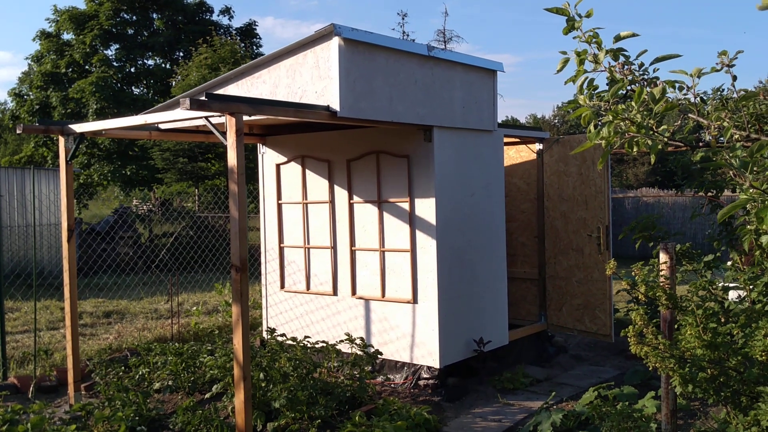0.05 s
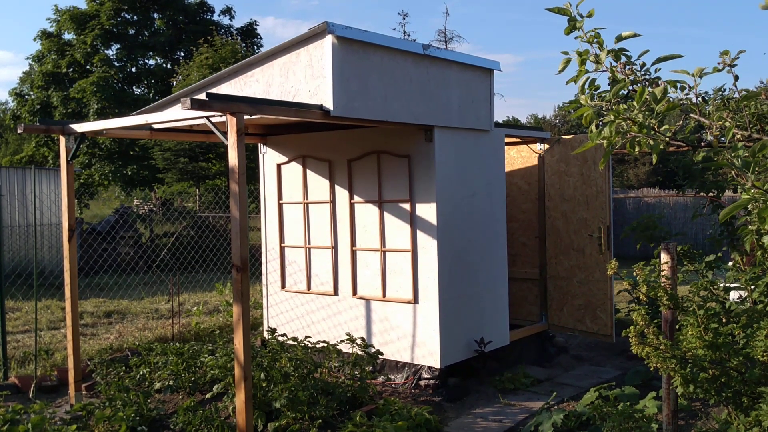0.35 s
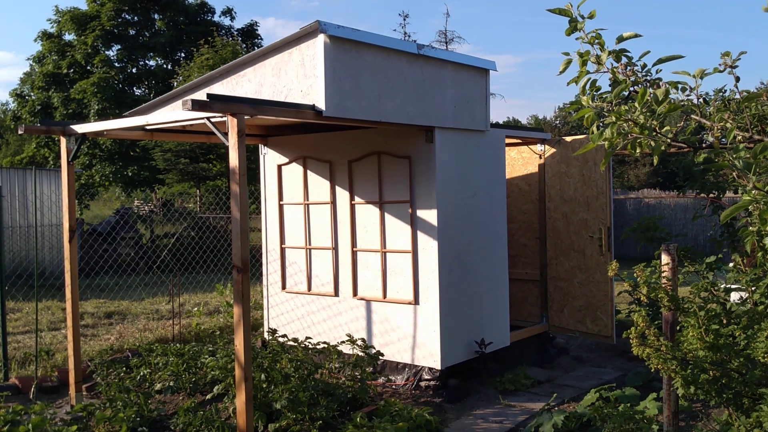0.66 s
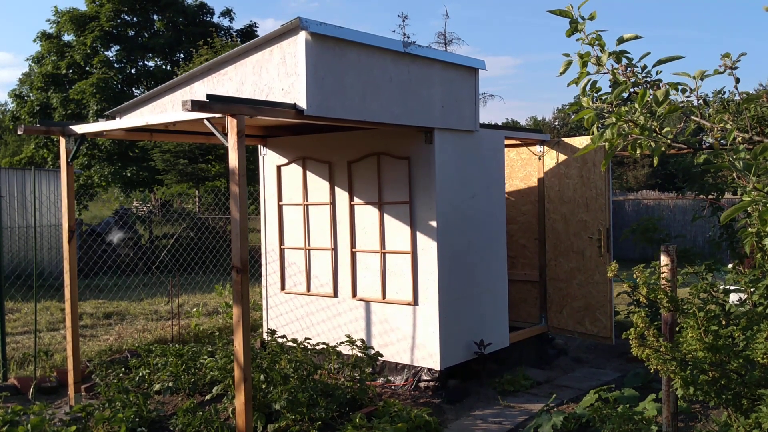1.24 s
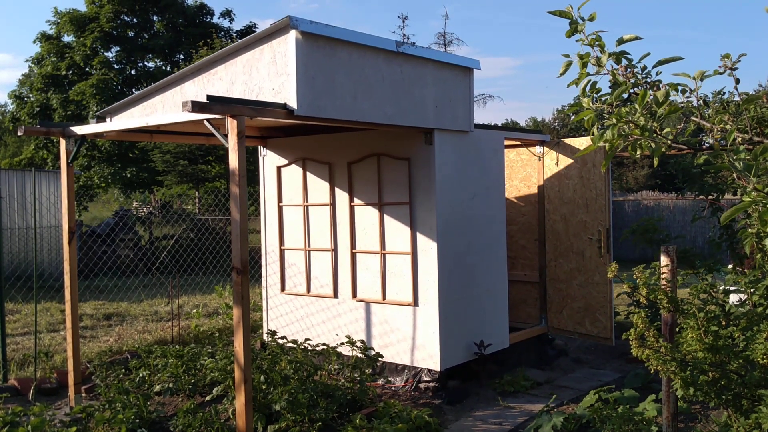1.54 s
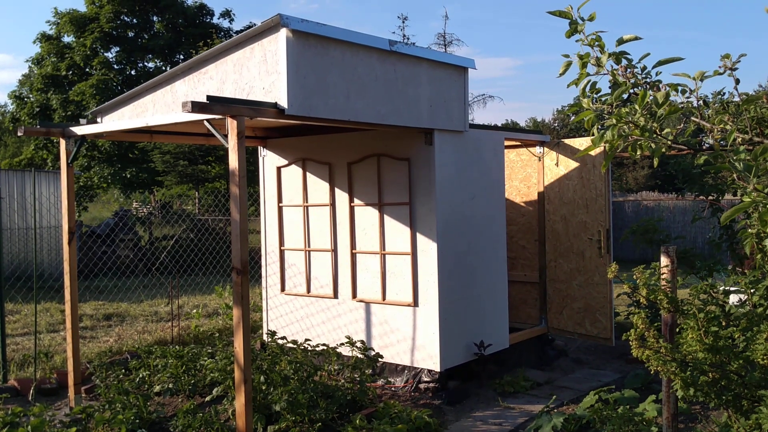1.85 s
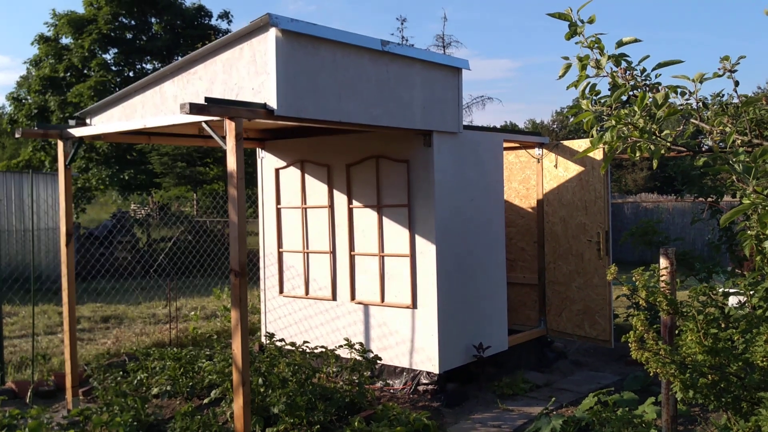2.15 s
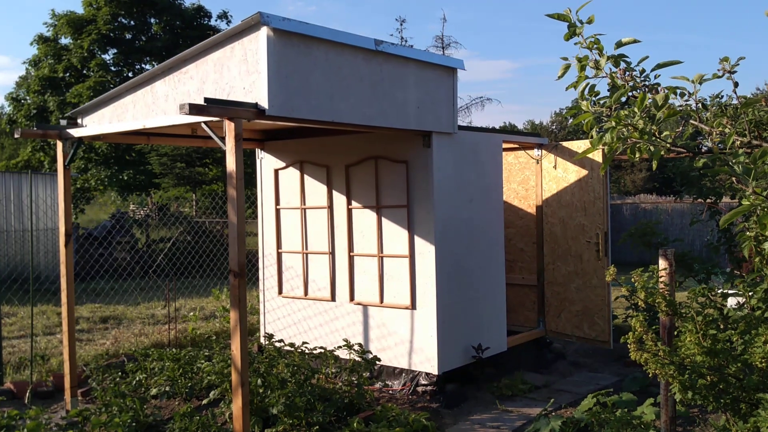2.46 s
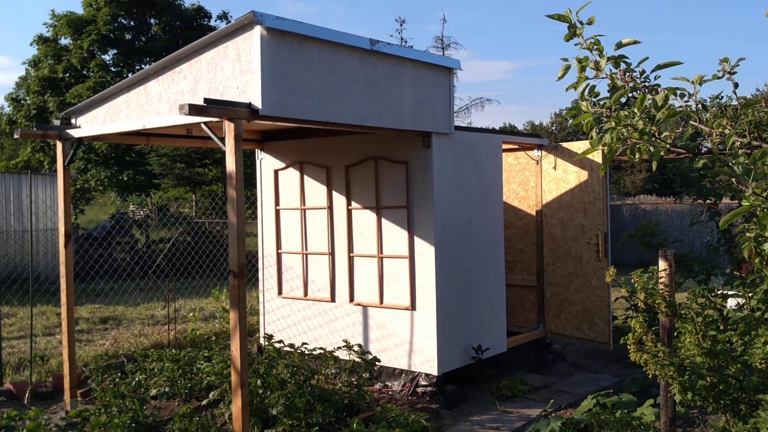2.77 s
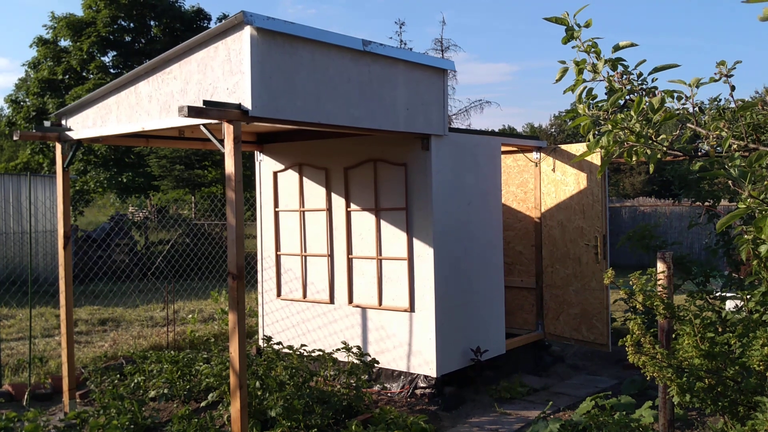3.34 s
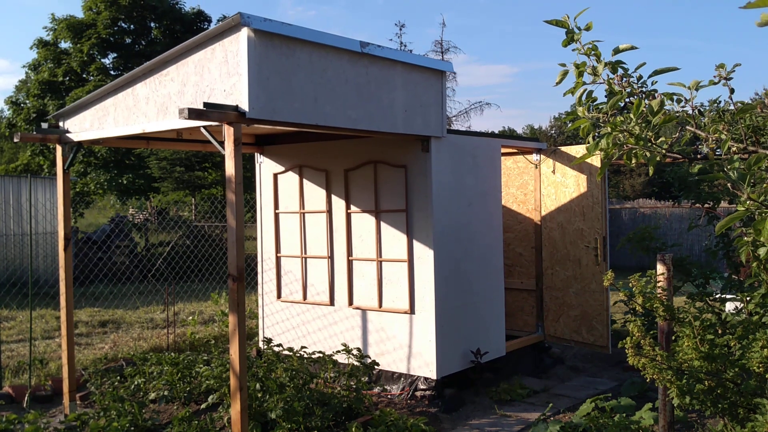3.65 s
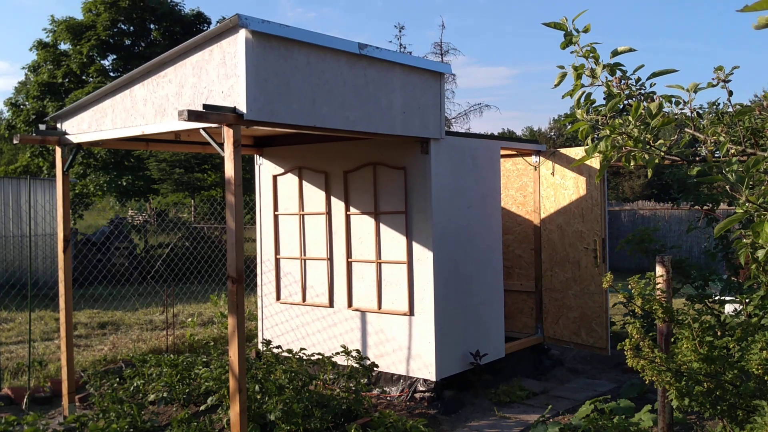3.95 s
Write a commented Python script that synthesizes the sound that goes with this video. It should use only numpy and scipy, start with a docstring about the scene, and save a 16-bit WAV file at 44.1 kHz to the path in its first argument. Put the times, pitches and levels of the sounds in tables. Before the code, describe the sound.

A small wooden roof rolls along rails with a low rumble, rattling and knocking. It squeaks once midway, then slows to a stop as a distant bird chirps over a soft garden hush.

```python
"""A low wooden rumble: a small roof rolls along rails in a garden, then slows to a stop.
Its rollers drum the panels and rattle on the rails, the frame ticks, and an edge brushes along.
One sharp squeak sounds midway. A far bird chirps once at the start and again as the rumble dies.
The garden hums and hisses softly behind it all."""
import sys
import numpy as np
from scipy import signal
from scipy.fft import rfft, irfft
from scipy.io import wavfile

SR = 44100
rng = np.random.default_rng(int(sys.argv[2]) if len(sys.argv) > 2 else 0)


def pcm_store(signal):
    """Save signal as 16-bit PCM."""
    levels = np.round(np.clip(np.atleast_2d(signal), -1, 1) * 32767)
    wavfile.write(sys.argv[1], SR, levels.astype(np.int16).T)


N = 176400
TIME = np.arange(N) / SR
SIZE = 2 ** 18  # samples, with room for ringing
HZ = np.maximum(np.arange(SIZE // 2 + 1) * SR / SIZE, 1)


def roof():
    """The wooden panels boom as the rollers drum on them."""
    # Each row: time in seconds, level in dB.
    push = [(0, -43.5), (.55, -42.5), (.95, -43), (1.25, -42), (1.5, -40), (1.8, -40.5), (2.1, -42),
            (2.4, -41), (2.5, -45.5), (2.72, -48.5), (2.8, -49.5), (3.1, -55), (3.5, -57.5), (3.8, -68.5),
            (4, -62.5)]
    # Each row: pitch in Hz, relative level in dB.
    colour = [(20, -38.5), (33, -20), (47, -16), (70, 1), (90, -2.5), (115, -7.5), (180, -5), (270, -10),
              (380, -9), (480, -16.5), (700, -27), (1500, -73), (4000, -79)]
    # Each row: ringing pitch in Hz, width in Hz, boost in dB.
    modes = [(44, 4.2, 3.5), (62.6, 1.3, 7), (87.5, 9.1, 5.5), (138, 9.3, 1.5), (163, 4.7, 1.5),
             (194.4, 13.7, 4.5), (232.7, 3.7, 5.5), (312.3, 3.9, 8.5), (340, 16, 4)]
    return body(level(push) * rolling(smooth_db=4, judder_db=0.5, judder_hz=17), colour, modes)


def rolling(smooth_db, judder_db, judder_hz, grit_per_s=420, grit_spread_db=2.5):
    """The force of rolling: jolts from grit over a smooth rub, under a shaking load."""
    sizes = from_db(grit_spread_db * np.minimum(rng.exponential(1, N), 3)) * rng.choice([-1, 1], (2, N))
    jolts = rms_one(sizes * (rng.random(N) < grit_per_s / SR))
    rub = from_db(smooth_db) * rng.standard_normal((2, N))
    return rms_one((jolts + rub) * from_db(judder_db * np.tanh(drift(judder_hz))))


def panels():
    """Each part of the roof rings most as the rollers pass under it."""
    # Each row: loudest moment and half-length in seconds, pitch and width in Hz, level in dB.
    swells = [(0.533, 0.19, 335, 13, -51.5), (0.545, 0.56, 197, 86, -51.5), (1.15, 0.23, 58, 9.4, -54.5),
              (1.29, 0.33, 138.3, 14, -53), (1.59, 0.54, 192, 83, -49.5), (1.7, 0.24, 340, 90, -51.5),
              (1.852, 0.53, 88.8, 17.4, -49), (1.956, 0.6, 204, 26, -49)]
    return sum(from_db(db) / (1 + np.square((TIME - s) / half_s) ** 2) * noise_band(hz, width)
               for s, half_s, hz, width, db in swells)


def bumps(rise_s=0.015):
    """Each bump makes one panel swell into a short boom and die away."""
    # Each row: start in seconds, level in dB, pitch in Hz.
    booms = [(.165, -44, 292), (0.369, -44.5, 190), (.445, -43.5, 221.6), (0.516, -40.5, 340),
             (.79, -41.5, 192.4), (1.12, -47, 86.5), (1.31, -44, 166.3), (1.358, -40, 182),
             (1.485, -41, 68.4), (1.495, -47, 311), (1.575, -42, 205), (1.65, -42, 204.1),
             (1.878, -36.5, 184), (2.28, -45.5, 204.2), (2.39, -42, 80), (2.395, -44.5, 200.4),
             (2.68, -46, 84.8), (2.69, -54, 224.3), (3.925, -71, 240)]
    out = np.zeros(N)
    for s, db, hz in booms:
        age = np.clip((TIME - s) / rise_s, 0, 20)
        tone = np.sqrt(2) * np.sin(2 * np.pi * (hz * TIME + rng.random()))
        out += from_db(db) * age * np.exp(1 - age) * tone
    return out


def rails(knock_boost_db=14.5):
    """The rollers chatter on the rails and now and then give a hollow knock."""
    # Each row: time in seconds, relative level in dB.
    loudness = [(0, -49), (.6, -49), (1.2, -47.5), (1.45, -46), (2.05, -48.5), (2.38, -49), (2.5, -53),
                (2.76, -59.5), (2.88, -59), (3, -64), (3.6, -70), (4, -82)]
    hits = [(.341, -50), (.405, -45), (.514, -32), (.701, -43), (.874, -30.5), (1.013, -31.5), (1.202, -31),
            (1.318, -32), (1.422, -29.5), (1.631, -29.5), (1.705, -33), (1.794, -33.5), (1.94, -27.5),
            (1.975, -29.5), (2.165, -30.5), (2.229, -33), (2.247, -31), (2.336, -33), (2.366, -32.5),
            (2.409, -37), (2.592, -37.5), (2.88, -41.5), (3.937, -46)]
    # Each row: pitch in Hz, relative level in dB.
    rail_colour = [(200, -27.5), (450, -11.5), (580, -5.5), (700, -1), (870, -3.5), (1000, -15),
                   (1400, -14.5), (1750, -24.5), (2200, -20), (3000, -24), (4000, -34.5), (6000, -40),
                   (14000, -49.5)]
    knock_colour = [(200, -23.5), (480, -14.5), (640, -9), (780, 9), (900, -6.5), (1020, -13.5),
                    (1400, -18.5), (2000, -53), (4000, -39), (14000, -51)]
    # Each row: ringing pitch in Hz, width in Hz, boost in dB.
    modes = [(502, 5.7, 2.5), (698, 11, 3.4), (791, 50, 2.3), (865, 27, 4.4), (1086, 86, 6.8),
             (1677, 35, 9.6), (1920, 45, 10), (2830, 23, 2.8)]
    chatter = level(loudness) * rolling(smooth_db=3, judder_db=2.5, judder_hz=36.2)
    knocks = np.zeros((2, N))
    for s, db in hits:
        knocks[:, int(s * SR)] = from_db(db + knock_boost_db) * rng.choice([-1, 1], 2)
    return body(chatter, rail_colour, modes) + body(knocks, knock_colour, modes)


def frame(split_hz):
    """The frame gives dry ticks, some dull and some bright."""
    # Each row: start in seconds, level in dB, extra treble in dB, fade time in seconds.
    ticks = [(.298, -49, -5, 0.025), (0.653, -58, 8.5, 0.011), (0.724, -48, -9, 0.015),
             (0.799, -46, -5.5, .018), (.972, -47.5, 7, 0.006), (1.314, -36, -30, .012),
             (1.383, -51, 2.5, 0.022), (1.523, -48.5, -2.5, 0.0086), (1.943, -51, -.5, 0.01),
             (2.07, -50, -7, 0.0063), (2.23, -49, -11, .008), (2.244, -44, -10, 0.0069),
             (2.407, -48, -16, 0.0084), (2.797, -54.5, -5, 0.042), (2.849, -61, -10, 0.013),
             (3.936, -60.5, 2.5, 0.021)]
    # Each row: pitch in Hz, relative level in dB.
    colour = [(300, -13), (800, 8), (1200, 9.5), (1500, 8), (2000, 5), (3200, 3), (4200, -7), (5500, -3.5),
              (8000, -21), (14000, -28)]
    thud = body(blows([(s, db, decay) for s, db, _, decay in ticks]), colour)
    crack = body(blows([(s, db + bright, decay) for s, db, bright, decay in ticks]), colour)
    dull = signal.sosfilt(signal.butter(4, split_hz, fs=SR, output="sos"), thud)
    return dull + signal.sosfilt(signal.butter(2, split_hz, "high", fs=SR, output="sos"), crack)


def blows(rows):
    """Short crunches of force that start suddenly and die away."""
    envelope = sum(from_db(db) * (TIME >= s) * np.exp(-np.clip((TIME - s) / decay_s, 0, 20))
                   for s, db, decay_s in rows)
    return envelope * rng.standard_normal((2, N))


def edge():
    """The roof's edge brushes along with a fine, gritty hiss."""
    # Each row: time in seconds, level in dB.
    brush = [(0, -67), (.78, -69), (.98, -58.5), (1.25, -61), (1.39, -56.5), (1.48, -67), (1.7, -71),
             (2.2, -68), (2.55, -69.5), (2.8, -62), (3.08, -68.5), (3.2, -69), (4, -99)]
    # Each row: pitch in Hz, relative level in dB.
    colour = [(500, -0.5), (1400, 9), (3000, 2), (4300, 1), (6000, -8.5), (7700, -2.5), (9000, -4.5),
              (11500, -6.5), (14000, -22)]
    return body(level(brush) * rolling(smooth_db=9, judder_db=2.1, judder_hz=30.6), colour)


def squeak():
    """A quick run of sharp, squeaky notes squeals over a grating rasp."""
    # Each row: start and length in seconds, first and last pitch in Hz, level in dB,
    # waver as a share of the pitch, left minus right in dB.
    chirps = [(1.962, 0.072, 7400, 6600, -62.5, 0.035, 16), (1.976, 0.022, 5400, 3960, -60, 0.073, 12),
              (1.990, 0.018, 4300, 6940, -61, 0.0316, -6), (2.002, 0.0157, 3750, 4130, -48, 0.0071, -12),
              (2.020, 0.0132, 3200, 4160, -55, 0.038, -22), (2.024, 0.032, 5400, 4390, -61.5, 0.046, 0),
              (2.037, 0.0288, 3150, 2885, -48.5, 0.0219, -5), (2.047, 0.031, 3118, 2694, -43, 0.0201, 13),
              (2.070, 0.0174, 2850, 2720, -50, 0.062, 1)]
    # Each row: time in seconds, level in dB.
    rasp = [(1.945, -73), (1.975, -57), (2.0, -57), (2.012, -62), (2.03, -56), (2.055, -72), (2.1, -110)]
    # Each row: pitch in Hz, relative level in dB.
    colour = [(2000, -17), (3200, -7), (4500, 0.5), (6000, -8), (7400, -10.5), (8400, -22), (9500, -15),
              (10600, -11), (12000, -22), (14000, -40)]
    squeal = outdoors(whistles(chirps, waver_hz=580, rough_db=0.5), wet_db=-9, t60_s=0.27, build_s=0.021)
    return squeal + body(level(rasp) * rng.standard_normal((2, N)), colour)


def bird():
    """A far bird whistles short, sliding notes."""
    # Each row: start and length in seconds, first and last pitch in Hz, level in dB,
    # waver as a share of the pitch, left minus right in dB.
    notes = [(.055, .044, 3480, 3650, -67, 0.049, 0), (3.265, 0.051, 4160, 3800, -72, .015, 0),
             (3.32, 0.059, 3830, 3800, -66.5, .004, 5), (3.46, .065, 3200, 3740, -63.5, .05, 4),
             (3.505, 0.032, 3700, 4350, -67, .045, 1.5), (3.524, 0.018, 3900, 3200, -62, 0.056, 1.5),
             (3.535, 0.051, 3000, 2934, -53.5, .007, 1.3), (3.648, .06, 3200, 3700, -63, 0.045, 2),
             (3.69, 0.036, 3700, 4350, -64, .045, 2), (3.714, 0.032, 3700, 2970, -61.5, 0.063, 1),
             (3.735, .09, 3060, 3050, -66.5, 0.027, 1), (3.828, 0.07, 3250, 3680, -63.5, 0.0427, 1.9),
             (3.868, 0.032, 3650, 4160, -65, .04, 6), (3.89, 0.048, 3540, 3160, -61, 0.039, 1),
             (3.90, 0.086, 3095, 3000, -63, .03, 0)]
    return outdoors(whistles(notes, waver_hz=434, rough_db=2.5), wet_db=-2.5, t60_s=0.43, build_s=0.0054)


def whistles(notes, waver_hz, rough_db):
    """Sliding, wavering tones that each swell and fade."""
    out = np.zeros((2, N))
    waver = drift(waver_hz)
    flicker = from_db(rough_db * drift(waver_hz))
    for s, length, start_hz, end_hz, db, share, side_db in notes:
        along = np.clip((TIME - s) / length, 0, 1)
        hz = (start_hz + (end_hz - start_hz) * along) * (1 + share * waver)
        tone = np.sqrt(2) * np.sin(2 * np.pi * np.cumsum(hz) / SR)
        out += pan(side_db) * from_db(db) * np.sin(np.pi * along) * flicker * tone
    return out


def garden(hush_db=-62.5):
    """A steady low hush, and a thin high hiss that fades near the end."""
    # Each row: pitch in Hz, relative level in dB.
    colour = [(20, -33), (45, -7), (80, 2), (200, -10), (500, -9.5), (750, -13), (1000, -12.5),
              (2000, -18.5), (3200, -18.5), (4100, -16.5), (4750, -13), (5400, -24.5), (6500, -26.5),
              (11000, -32), (14000, -32.5)]
    # Each row: time in seconds, level in dB.
    hiss = [(0, -68), (1.5, -67), (2.8, -68.5), (3.35, -70.5), (3.55, -74), (4, -76)]
    hush = from_db(hush_db) * body(rng.standard_normal((2, N)), colour)
    return hush + level(hiss) * noise_band(hz=4765, width_hz=356)


def outdoors(x, wet_db, t60_s, build_s):
    """Add echoes from walls and trees; they fall by 60 dB in t60_s seconds."""
    fade = from_db(-60 * np.minimum(TIME / t60_s, 2))
    scatter = rng.standard_normal((2, N)) * fade * (1 - np.exp(-TIME / build_s))
    return x + from_db(wet_db) * signal.fftconvolve(x, rms_one(scatter) / np.sqrt(N), axes=1)[:, :N]


def spread(pair):
    """Mix two unrelated sounds into left and right, pitch by pitch."""
    # Each row: pitch in Hz, how alike the sides are (near 1 the same, near -1 opposite).
    likeness = [(60, 0.72), (130, 0.27), (250, 0.73), (400, 0.57), (600, 0.85), (1100, 1), (1400, 0.59),
                (1700, -0.13), (2100, -1.056), (2650, 0.45), (3150, 0.86), (3500, 0.6), (3850, -0.62),
                (4200, -1.11), (4700, 0.1), (5300, 0.83), (5800, .1), (6300, -0.95), (7300, 0.66),
                (8400, -0.47), (9400, 0.15), (14000, -0.093)]
    # Each row: pitch in Hz, left minus right in dB.
    balance = [(30, 12), (60, 7.5), (110, 2.5), (190, -1), (700, -1.5), (1200, 1.3), (2200, 1), (4000, 1),
               (13000, 1.3)]
    mid, side = rfft(pair, SIZE)
    alike = np.clip(across_hz(likeness), -.98, .98)
    both = np.sqrt((1 + alike) / 2) * mid + np.sqrt((1 - alike) / 2) * side * np.array([[1], [-1]])
    return irfft(both * pan(across_hz(balance)))[:, :N]


def body(force, colour, modes=()):
    """Ring an object that has a broad tone colour and some ringing pitches (modes)."""
    peaks_db = sum(db / (1 + (2 * (HZ - hz) / width) ** 2) for hz, width, db in modes)
    gain = rms_one(from_db(across_hz(colour) + peaks_db))
    # Folding the cepstrum makes the ringing follow each push, never lead it.
    cepstrum = irfft(np.log(gain))
    cepstrum[1:SIZE // 2] *= 2
    cepstrum[SIZE // 2 + 1:] = 0
    return irfft(rfft(force, SIZE) * np.exp(rfft(cepstrum)))[:, :N]


def noise_band(hz, width_hz):
    """Noise close to one pitch."""
    edges = np.clip([hz - width_hz / 2, hz + width_hz / 2], 10, SR * .45)
    band = signal.butter(2, edges, "band", fs=SR, output="sos")
    return rms_one(signal.sosfilt(band, rng.standard_normal((2, N))))


def drift(rate_hz):
    """A random wobble, mostly slower than rate_hz."""
    return rms_one(irfft(rfft(rng.standard_normal(SIZE)) / (1 + (HZ / rate_hz) ** 2))[:N])


def pan(db):
    """Left and right gains, with the left louder by db."""
    gains = from_db(np.array([[.5], [-.5]]) * db)
    return gains / np.sqrt(np.mean(gains ** 2, axis=0))


def level(curve):
    """Gain over time from (seconds, dB) points."""
    return from_db(np.interp(TIME, *np.transpose(curve)))


def across_hz(points):
    """Join (Hz, value) points into a curve over pitch."""
    hz, value = np.transpose(points)
    return np.interp(np.log(HZ), np.log(hz), value)


def from_db(db):
    """Turn decibels into a gain to multiply by."""
    return 10 ** (np.asarray(db) / 20)


def rms_one(x):
    """Scale to an average strength (rms) of 1."""
    return x / np.sqrt(np.mean(x ** 2) + 1e-20)


def scene():
    """The rolling roof, a sharp squeak and the bird in the garden."""
    background = garden()
    moving = roof() + panels() + rails() + frame(split_hz=1860) + edge()
    high_notes = squeak() + bird()
    return spread(moving + background) + bumps() + high_notes


def record(dry, cutoff_hz=14150):
    """Cut away the highest treble."""
    return irfft(rfft(dry, SIZE) / (1 + (HZ / cutoff_hz) ** 200))[:, :N]


dry = scene()
out = record(dry)
pcm_store(out)
```